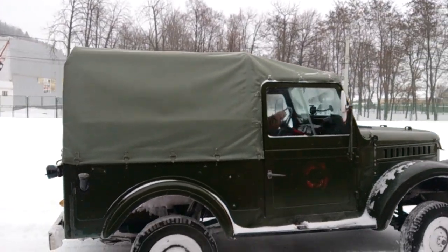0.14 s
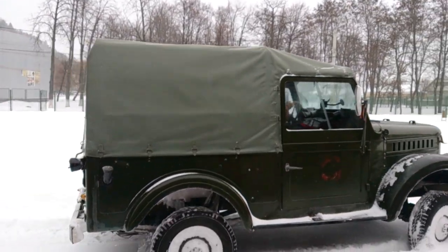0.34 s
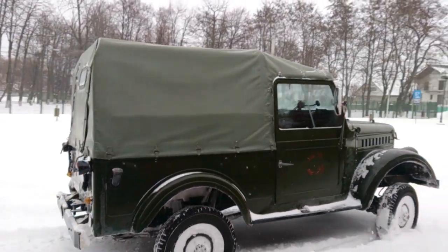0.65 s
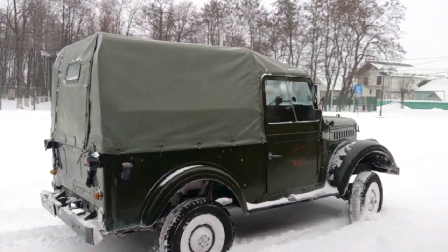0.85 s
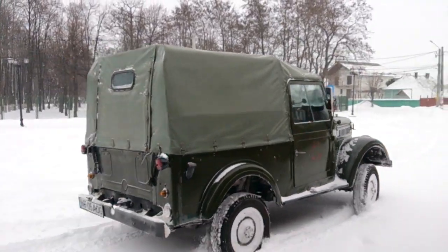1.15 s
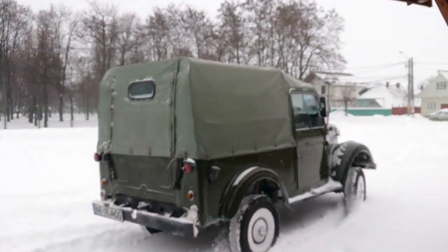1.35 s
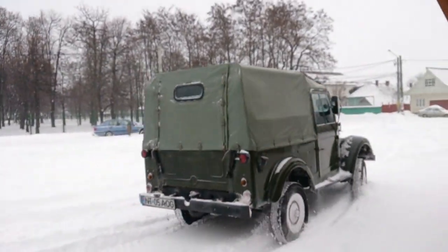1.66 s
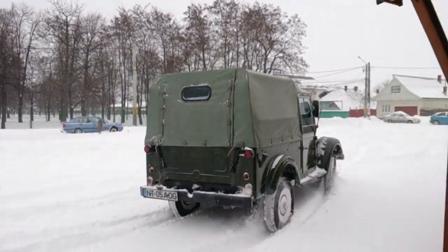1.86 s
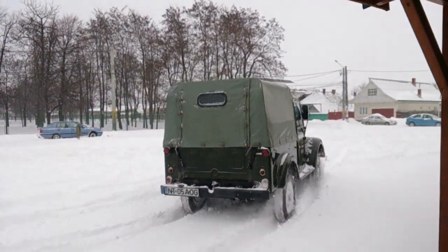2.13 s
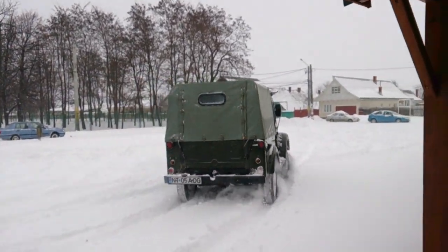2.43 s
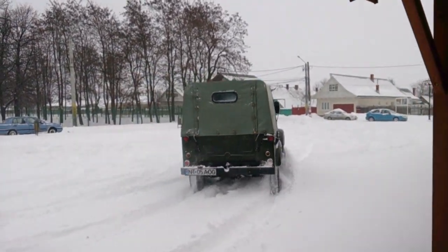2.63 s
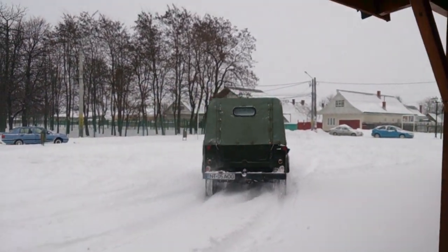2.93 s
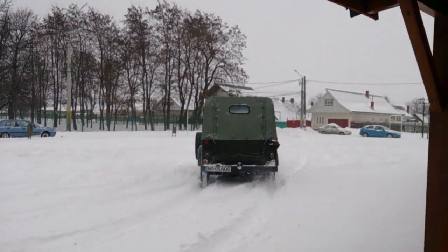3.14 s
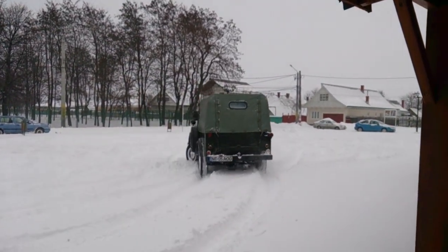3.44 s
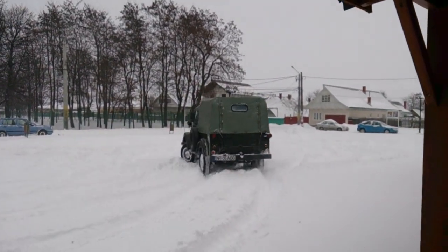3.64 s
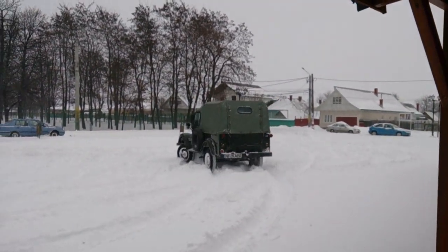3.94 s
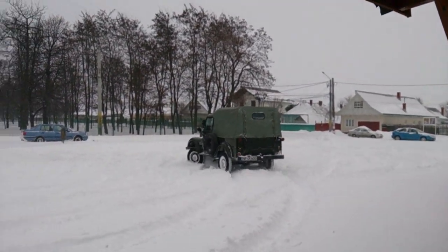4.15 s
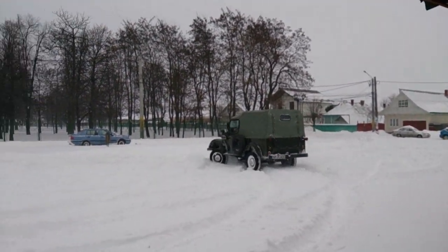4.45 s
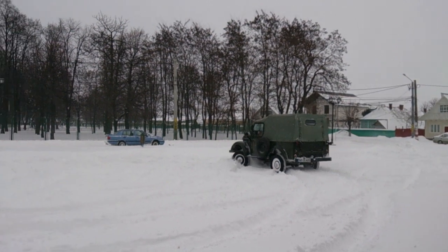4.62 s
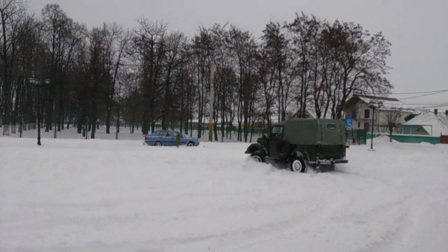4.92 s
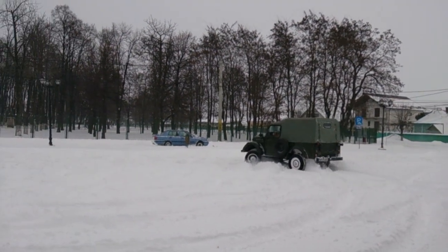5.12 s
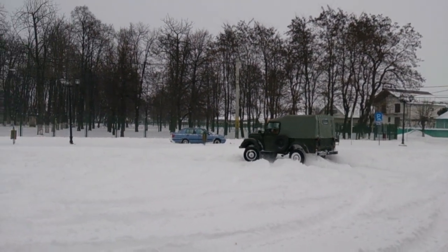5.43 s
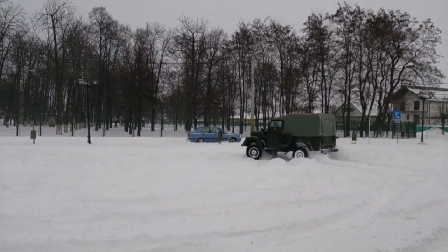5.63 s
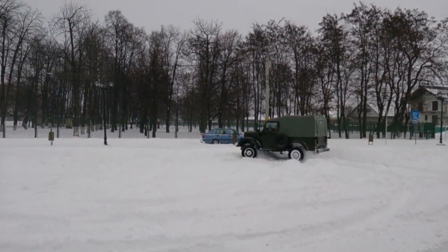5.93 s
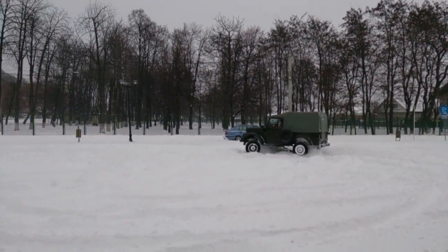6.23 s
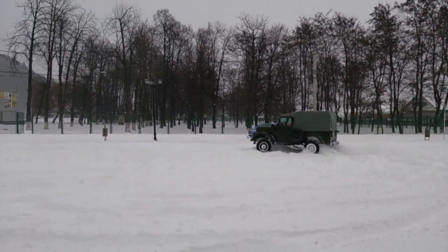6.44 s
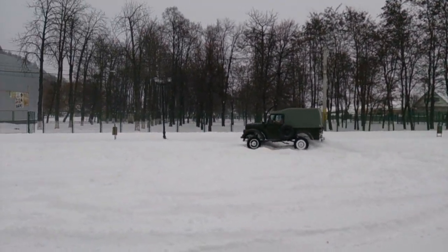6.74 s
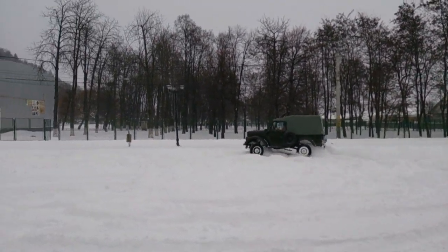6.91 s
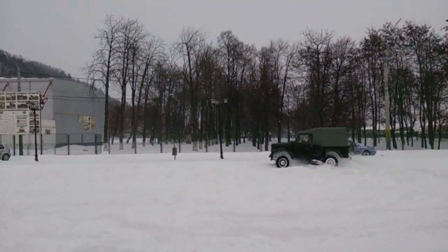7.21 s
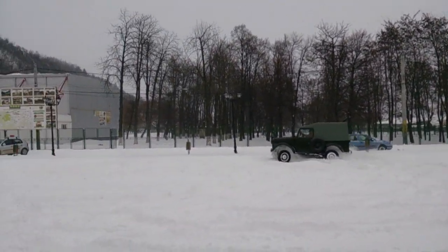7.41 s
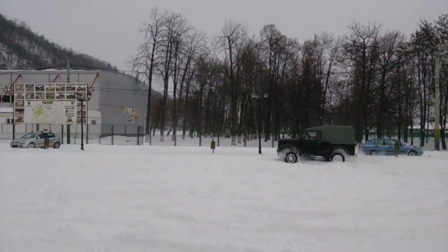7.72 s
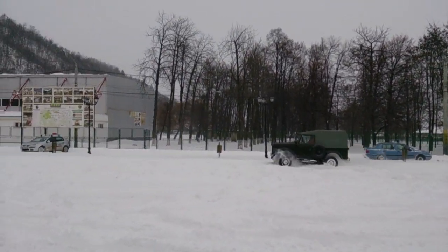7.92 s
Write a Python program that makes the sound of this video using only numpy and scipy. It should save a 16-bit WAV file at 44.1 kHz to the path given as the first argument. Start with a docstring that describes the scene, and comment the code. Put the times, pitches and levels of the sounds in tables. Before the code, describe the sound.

Outdoors in deep snow, an old canvas-topped off-roader passes very close to a hand-held stereo microphone. Its exhaust throbs low and sags almost to a stall while snow crunches and bodywork groans. The engine then picks up steadily, sheet metal knocks, and it circles away with growing clatter, metallic ticking and hiss. Soft wind rumble and a few dull microphone bumps come near the end.

```python
"""In deep snow, an old four-cylinder off-roader lugs past a hand-held stereo microphone at walking pace.
It then pulls away in a wide turn. The exhaust booms as orders of the firing rate shaped by pipe resonances.
Noise bursts at each firing make clatter, ticks and hiss, and set the body panels droning.
Shaped noise makes the tyres' rush, crunching snow and light wind; narrow bands of it squeak and groan.
Late on, short thuds bump softly against the microphone."""
import sys
import numpy as np
from scipy import signal
from scipy.fft import rfft, irfft, next_fast_len
from scipy.io import wavfile
from scipy.ndimage import uniform_filter1d, map_coordinates

SR = 44100
rng = np.random.default_rng(int(sys.argv[2]) if len(sys.argv) > 2 else 0)


def output_pcm(signal):
    """Save a mono or channel-first signal as 16-bit PCM at the path in sys.argv[1].

    Samples are clipped to [-1, 1] before scaling.
    """
    pcm = np.clip(np.atleast_2d(signal).T, -1, 1) * 32767
    wavfile.write(sys.argv[1], SR, np.round(pcm).astype(np.int16))


N = 355887
TIME = np.arange(N) / SR
SIZE = next_fast_len(N + 8192, real=True)
BINS = np.maximum(np.arange(SIZE // 2 + 1) * SR / SIZE, 1)   # Hz


def from_db(db):
    """Decibels to gain."""
    return 10 ** (np.asarray(db) / 20)


def rms_one(x):
    """Scale to rms 1."""
    return x / np.sqrt(np.mean(x ** 2) + 1e-20)


def in_time(rows):
    """The columns of a curve at every sample."""
    s, *columns = np.transpose(rows)
    return [np.interp(TIME, s, c) for c in columns]


def at_hz(points, hz):
    """Read a spectrum on a log-frequency axis."""
    f, value = np.transpose(points)
    return np.interp(np.log(hz), np.log(f), value)


def filtered(x, gain):
    """Apply one gain per frequency bin."""
    return irfft(rfft(x, SIZE) * gain, SIZE)[..., :N]


def coloured(x, spectrum):
    """Give a sound a spectrum that falls away beyond its ends; rms 1."""
    top_skirt = 1 / (1 + (BINS / spectrum[-1][0] / 2) ** 4)
    low_skirt = 1 / (1 + (spectrum[0][0] / BINS / 2) ** 4)
    return rms_one(filtered(x, from_db(at_hz(spectrum, BINS)) * top_skirt * low_skirt))


def drift(rate):
    """Random wander of rms 1, drawn between rate random points a second."""
    return rms_one(np.interp(TIME * rate, np.arange(8192), rng.standard_normal(8192)))


# how alike the noise is at the two ports: pitch_hz, correlation (0 to 1)
PORT_LIKENESS = [(60, 0.95), (140, 0.15), (300, 0.85), (650, 0.86), (1300, 0.55), (2500, 0.095),
                 (4500, 0.087), (8000, 0.16), (14000, 0.15)]


def air_noise():
    """White stereo noise whose likeness at the two ports depends on pitch."""
    alike = np.clip(at_hz(PORT_LIKENESS, BINS), 0, 1)
    mid, side = filtered(rng.standard_normal((2, N)), np.sqrt([1 + alike, 1 - alike]))
    return rms_one(np.array([mid + side, mid - side]))


def resonate(x, hz, width):
    """One resonance with gain 1 on top."""
    r = np.exp(-np.pi * width / SR)
    feedback = [1, -2 * r * np.cos(2 * np.pi * hz / SR), r * r]
    return signal.lfilter(np.array([1, 0, -1]) * (1 - r * r) / 2, feedback, x + 1e-18)


def band(drive, centre_hz, half_width_hz):
    """Noise gathered round a centre that may move; rms 1."""
    slow = signal.sosfilt(signal.butter(2, half_width_hz, fs=SR, output="sos"), drive)
    return rms_one(slow * np.sin(2 * np.pi * np.cumsum(centre_hz + np.zeros(N)) / SR))


def bell(x, centre, half_width):
    """A smooth rise and fall with height 1."""
    return np.exp(-((x - centre) / half_width) ** 2)


def swells(rows):
    """Add up smooth swells (centre_s, half_length_s, heights..); one curve per column of heights."""
    return sum(np.outer(heights, bell(TIME, s, half_s)) for s, half_s, *heights in rows)


def firing_samples(turn):
    """The sample at which each firing falls; turn counts the firings so far."""
    return np.flatnonzero(np.diff(np.floor(turn)) > 0) + 1


def cylinder_pattern(turn, cylinders_db, contrast):
    """Level in dB of the cylinder whose turn it is, at every sample."""
    return contrast * np.take(cylinders_db, np.floor(turn).astype(int), mode="wrap")


def strokes(turn, cylinders_db, decay_s, scatter_db, between, contrast=1):
    """A decaying burst at each firing, each of its own strength, over a steady share; rms 1."""
    at = firing_samples(turn)
    pattern_db = cylinder_pattern(turn, cylinders_db, contrast)
    chance = rng.standard_normal(1024)[:len(at)].clip(-2, 2)
    hits = np.zeros(N)
    hits[at] = from_db(pattern_db[at] + scatter_db * chance)
    bursts = signal.lfilter([1], [1, -np.exp(-1 / (decay_s * SR))], hits)
    return rms_one(uniform_filter1d(bursts, size=90) + between)


# each ring peaks after RING_S, sinking in pitch all the while
RING_S, RING_SINK_HZ_PER_S = 0.0014, 32000


def rings(blows, stray=0.55):
    """Blows (s, peak dB, Hz) ring as short sinking tones, each with its own phase at the two ports."""
    out, age = np.zeros((2, N + 2048)), np.arange(1024) / SR
    shape = age / RING_S * np.exp(1 - age / RING_S)
    for (s, db, hz), (phase, apart) in zip(blows, rng.standard_normal((1024, 2))):
        cycles = np.cumsum(hz - RING_SINK_HZ_PER_S * (age - 2 * RING_S)) / SR + phase
        port_phase = stray * apart * np.array([[1], [-1]])
        at = int(s * SR)
        out[:, at:at + len(age)] += from_db(db) * shape * np.sin(2 * np.pi * cycles + port_phase)
    return out[:, :N]


# the car's way past and round: time_s, distance_m (for the close sounds), left_lag_samples
CAR_PATH = [(0, 1.67, 2.5), (.8, 2.57, -0.5), (1.65, 2.57, -5.5), (2.7, 5.9, -6.5), (3.2, 10.3, -11),
            (4.2, 8.8, -10.5), (4.8, 52, -6), (8.07, 8.7, -6.5)]


def nearness_db():
    """Level by spreading, relative to two metres."""
    return -20 * np.log10(in_time(CAR_PATH)[0] / 2)


# below LUG_RATE firings per s the engine lugs in full
LUG_RATE = 30


def lugging(rate):
    """1 while the engine is near a stall, falling as it picks up."""
    return np.minimum(LUG_RATE / rate, 1) ** 2


# make-up of the exhaust pulses: multiple of the firing rate, then relative level_db at each ORDER_RATES
EXHAUST_ORDERS = [(.5, -14, -17, -8, -9), (1, 4.5, 3.5, 6, 1.5), (1.5, -14, -14.5, -12.5, -19),
                  (2, -4, 9.5, 0, -10), (2.5, -17, -15, -19, -7), (3, 2, -4, -7.5, -14),
                  (4, -11, -19, -13, -25), (5, -4, -10, 4, -16), (6, -8, -15, -12, -14),
                  (7, -8, -19, -14, -16), (8, -18, -17, -15, -15)]
# engine speeds of those level columns: firings_per_s
ORDER_RATES = [23, 35, 50, 70]
# each order's phase turns as it sweeps up through the silencer's main resonance
SILENCER_HZ, SILENCER_HALF_WIDTH_HZ = 56, 7


def pipe_tones(rate, turn, leads, response, flutter_db, uneven_db, stumble):
    """Each order swells as it sweeps through a pipe's resonances; half orders tell of unequal cylinders."""
    out, power = 0, 0
    irregular_db = uneven_db * lugging(rate)   # at low revs the orders waver in strength
    turn = turn + stumble * lugging(rate) * drift(16)   # and the firings in timing
    for (multiple, *levels_db), lead in zip(EXHAUST_ORDERS, leads):
        order_hz = multiple * rate
        phase = lead - np.arctan((order_hz - SILENCER_HZ) / SILENCER_HALF_WIDTH_HZ)
        gain = from_db(np.interp(rate, ORDER_RATES, levels_db) + at_hz(response, order_hz))
        waver = from_db(flutter_db * drift(25) + irregular_db * drift(19))
        out = out + gain * waver * np.sin(2 * np.pi * multiple * turn + phase)
        power = power + gain ** 2 / 2
    return out / np.sqrt(power)


# course of the whole exhaust, before the trim of each part: time_s, level_db
EXHAUST_LEVEL = [(0, -23), (.16, -22.5), (.3, -34.5), (.5, -30), (.93, -27), (1.05, -34), (1.65, -25),
                 (1.88, -22), (2.07, -30), (2.35, -27.5), (3.4, -32.5), (4.15, -33), (4.7, -29),
                 (4.97, -25), (7.1, -27), (7.5, -28.5), (7.8, -31), (8.07, -32.5)]
# the tailpipe against that course, dropping as the pipe turns away: time_s, relative_db
TAILPIPE_LEVEL = [(0, -11.5), (.55, -5.5), (.78, -13), (1.0, -5), (1.3, -5), (1.8, -19), (2.45, -10),
                  (2.8, -12.5), (3.1, -21), (4.0, -31), (4.55, -31), (4.8, -38), (5.3, -24), (6.0, -38)]


def tailpipe_gain():
    """Strength of the tailpipe's upper sound."""
    return from_db(in_time(EXHAUST_LEVEL)[0] + in_time(TAILPIPE_LEVEL)[0])


# resonances of the silencer: pitch_hz, relative level_db
SILENCER_RESPONSE = [(20, -13), (32, -10), (41, -17), (50, -9), (63, 0), (78, -2), (90, -6), (104, -27),
                     (119, -15.5), (134, -23), (160, -21), (195, -30), (240, -48), (330, -62)]
# upper resonances of the tailpipe: pitch_hz, relative level_db
TAILPIPE_RESPONSE = [(90, -35), (108, -12), (125, -1), (135, 4), (146, -3), (157, 0), (171, -2), (183, -14),
                     (200, -15), (260, -19), (330, -40), (400, -55)]
DRONE_BREAKUP = .5   # share of the drone lost when the engine lugs in full


def exhaust(rate, turn, boom_db=-2.5):
    """The same pulses boom in the silencer and drone in the tailpipe, where the orders are out of step."""
    in_step = np.zeros(len(EXHAUST_ORDERS))
    out_of_step = rng.uniform(0, 2 * np.pi, len(EXHAUST_ORDERS))
    boom = pipe_tones(rate, turn, in_step, SILENCER_RESPONSE,
                      flutter_db=0.4, uneven_db=1.5, stumble=0.0047)
    drone = pipe_tones(rate, turn, out_of_step, TAILPIPE_RESPONSE,
                       flutter_db=.8, uneven_db=2.8, stumble=0.014)
    boom_gain = from_db(in_time(EXHAUST_LEVEL)[0] + boom_db)
    drone_gain = tailpipe_gain() * (1 - DRONE_BREAKUP * lugging(rate))
    return boom_gain * boom + drone_gain * drone


# gas leaving the tailpipe: pitch_hz, relative level_db per Hz
BURBLE_SPECTRUM = [(20, -14), (40, -34), (65, 27), (100, -18), (138, 19.5), (170, 0), (200, -3), (300, -1),
                   (600, -40)]


def burble(rate, turn, level_db=1.0):
    """Turbulent gas leaves the tailpipe in puffs, most of all while the engine lugs."""
    puffs = strokes(turn, [0], decay_s=.008, scatter_db=2.0, between=.12)
    gain = from_db(level_db) * tailpipe_gain() * lugging(rate)
    return gain * coloured(air_noise() * puffs, BURBLE_SPECTRUM)


# engine noise, growing with the load and as the front comes round: time_s, level_db before offsets
ENGINE_LOAD = [(0, -47.5), (.7, -68.5), (1.8, -58), (3.3, -54), (4.4, -47), (5.0, -45.5), (5.5, -45.5),
               (6.2, -42), (7.35, -44.5), (7.75, -49), (8.07, -46)]
# the engine labours and its noise flares: centre_s, half_length_s, block_gain_db, hiss_gain_db
NOISE_FLARES = [(3.5, 0.26, 1, -4.5), (3.8, 0.14, 8, 4), (3.866, 0.007, 8.5, -12), (4.12, 0.16, 2.5, -3),
                (5.27, 0.15, 1, 6), (5.97, 0.11, 1.5, 3.5), (6.7, 0.097, 2.5, 4.5), (7.28, 0.42, 4.5, 6.5)]
# one hiss follows the load; the other is for close by and loses HISS_FALLOFF dB per dB of spreading
HISS_RE_LOAD_DB, HISS_NEAR_DB, HISS_FALLOFF = -10, -51.5, 0.82


def engine_levels():
    """Levels in dB of block, hiss and close hiss: the first two follow the load, and all flare together."""
    load_db, = in_time(ENGINE_LOAD)
    block_flare, hiss_flare = swells(NOISE_FLARES)
    near_db = HISS_NEAR_DB + HISS_FALLOFF * nearness_db()
    return load_db + block_flare, load_db + HISS_RE_LOAD_DB + hiss_flare, near_db + hiss_flare


# the four cylinders in firing order, spread further by the revs: relative level_db
CYLINDER_LEVELS = [-15.5, -7, -7, -5]
# resonances of the block: pitch_hz, half_width_hz, wander_hz, relative level_db
BLOCK_BANDS = [(1127, 135, 48, -9), (1807, 175, 30, -4), (2638, 530, 100, -2)]
# hiss of the engine that follows the load: pitch_hz, relative level_db per Hz
HISS_SPECTRUM = [(3300, 7.5), (4050, 9.5), (5000, 13), (5900, 7.5), (6700, 2.5), (8000, 2.5), (9200, 7.5),
                 (10200, -5), (12000, -8), (15000, -48)]
# hiss of the engine close by: pitch_hz, relative level_db per Hz
NEAR_HISS_SPECTRUM = [(3400, -9), (4000, -5), (5500, -4.5), (6600, -3), (8000, 6), (9200, 6), (10200, -3),
                      (12000, -6), (15000, -20.5)]
# a loose part rattles at a shifting pitch, stronger once the revs are up: time_s, level_db
RATTLE_LEVEL = [(4.35, -69), (4.65, -56), (5.6, -56.5), (6.5, -51), (7.3, -43), (7.75, -54.5),
                (8.07, -50.5)]
RATTLE_HZ, RATTLE_HALF_WIDTH_HZ, RATTLE_WANDER_HZ = 2600, 150, 80


def clatter(rate, turn):
    """Each firing shakes the block, rattles a loose part and lets out a puff of hiss."""
    block_db, hiss_db, near_db = engine_levels()
    contrast = (rate / 66) ** 2   # the cylinders grow more unequal with the revs
    shakes = strokes(turn, CYLINDER_LEVELS, decay_s=.0055, scatter_db=2.0, between=.22, contrast=contrast)
    puffs = strokes(turn, CYLINDER_LEVELS, decay_s=.005, scatter_db=2.8, between=.36, contrast=contrast)
    block = 0
    for hz, half_width, wander, db in BLOCK_BANDS:
        noise = band(air_noise() * shakes, hz + wander * drift(20), half_width)
        block = block + from_db(block_db + db - 5.5) * noise
    rattle_hz = RATTLE_HZ + RATTLE_WANDER_HZ * drift(22)
    rattle_noise = shakes * band(air_noise(), rattle_hz, RATTLE_HALF_WIDTH_HZ)
    rattle = from_db(in_time(RATTLE_LEVEL)[0]) * rattle_noise
    loaded_hiss = from_db(hiss_db) * coloured(air_noise() * puffs, HISS_SPECTRUM)
    near_hiss = from_db(near_db) * coloured(air_noise() * puffs, NEAR_HISS_SPECTRUM)
    return block + rattle + from_db(1.0 * drift(24)) * (loaded_hiss + near_hiss)


# course of the ticking, before the tick and buzz trims: time_s, lower_ring_db, upper_ring_db
TICK_LEVELS = [(0, -77, -76), (1.6, -65.5, -65), (3.0, -66, -77), (3.45, -59.5, -63.5), (3.75, -57, -55.5),
               (4.1, -74, -57), (4.35, -54, -59), (4.8, -56.5, -63), (5.5, -56, -61.5), (6.2, -44, -46),
               (6.8, -50.5, -49.5), (7.25, -38.5, -36.5), (7.75, -54, -54.5), (8.07, -57, -50.5)]
# the valve gear's two ringing pitches at higher revs: pitch_hz
TICK_PITCHES = [3680, 4695]
# both sit FLAT_HZ lower below the first of these engine speeds, and not beyond the second: firings_per_s
FLAT_RATES = [48.5, 50.5]
FLAT_HZ, RING_SCATTER_HZ = 230, 130


def valve_gear(rate, turn, tick_db=12.5, buzz_db=-7.5, buzz_half_width_hz=220, scatter_db=1.3):
    """A train of ringing ticks, one per firing, over a buzz at the same two pitches."""
    out, at = 0, firing_samples(turn)
    contrast = (rate / 66) ** 2
    pattern_db = cylinder_pattern(turn, CYLINDER_LEVELS, contrast)
    taps = strokes(turn, CYLINDER_LEVELS, decay_s=.005, scatter_db=2.0, between=.15, contrast=contrast)
    for hz, level_db in zip(TICK_PITCHES, in_time(TICK_LEVELS)):
        pitch = hz - np.interp(rate, FLAT_RATES, [FLAT_HZ, 0])
        strength, detune = rng.standard_normal((1024, 2))[:len(at)].clip(-2, 2).T
        peak_db = (level_db + pattern_db)[at] + tick_db + scatter_db * strength
        ticks = rings(zip(at / SR, peak_db, pitch[at] + RING_SCATTER_HZ * detune))
        buzz = band(air_noise() * taps, pitch, buzz_half_width_hz)
        out = out + ticks + from_db(level_db + buzz_db) * buzz
    return out


# the knock comes mostly from one of four cylinders: relative level_db
KNOCK_LEVELS = [-15.0, 0.0, -12.0, -14.0]
# body panels: pitch_hz, width_hz, knock_share, db_re_load, close_db (at two metres),
# critical_rate and rate_half_width (firings per s), boost_db there
BODY_PANELS = [(336, 56, 0.14, -27, -60, 24, 2.8, 3), (488, 86, 0.82, -27, -71, 52.7, 9.5, 9),
               (598, 103, 0.22, -15.5, -54, 25.6, 3, 4.5), (792.4, 58, 0.68, -17, -55, 39, 6, 9),
               (924, 50, 0.76, -14, -61, 49.9, 6.9, 8.5)]
PANEL_FALLOFF = 1.93   # dB lost per dB of spreading


def panels(rate, turn):
    """One strong knock in four firings sets the sheet metal droning, each panel most at its own revs."""
    out, load_db, near_db = 0, in_time(ENGINE_LOAD)[0], PANEL_FALLOFF * nearness_db()
    knock = strokes(turn + .3, KNOCK_LEVELS, decay_s=.009, scatter_db=1.5, between=.13)
    for hz, width, share, loaded_db, close_db, critical_rate, rate_width, boost_db in BODY_PANELS:
        drive = air_noise() * (1 + min(share, 1) * (knock - 1))
        gain = np.hypot(from_db(load_db + loaded_db), from_db(close_db + near_db))
        gain = gain * from_db(boost_db * bell(rate, critical_rate, rate_width))
        out = out + gain * rms_one(resonate(resonate(drive, hz, width), hz, 4 * width))
    return out


# rush of the tyres: pitch_hz, relative level_db per Hz
TYRE_SPECTRUM = [(120, 11), (230, 3), (330, -2), (450, 0.5), (700, -3), (1000, 1.5), (1400, -2), (2200, -4),
                 (4000, -14.5), (7000, -15), (14000, -54)]
# the wheels squeeze fresh snow: centre_s, half_length_s, level_db
SNOW_SQUEEZES = [(0.027, 0.58, -50), (1.5, 1, -74)]
# crunch of the snow: pitch_hz, relative level_db per Hz
SNOW_SPECTRUM = [(500, -37), (1200, 7), (2000, 2), (3300, 23), (5000, 8), (8000, 15.5), (11000, 9.5),
                 (15000, -19)]
# a rush heard close by, and wheelspin that grows with the revs (SPIN_DB at SPIN_RATE firings per s)
ROLL_NEAR_DB, ROLL_FALLOFF = -46, 0.84
SPIN_DB, SPIN_RATE, SPIN_DB_PER_RATE = -50, 75.3, 0.46


def tyres(rate):
    """The wheels roll with a dull rush and churn more as they speed up; close by, snow crunches in clumps."""
    near_gain = from_db(ROLL_NEAR_DB + ROLL_FALLOFF * nearness_db())
    spin_gain = from_db(SPIN_DB + SPIN_DB_PER_RATE * (rate - SPIN_RATE))
    roll_noise = coloured(air_noise() * from_db(1.8 * drift(70)), TYRE_SPECTRUM)
    roll = np.hypot(near_gain, spin_gain) * roll_noise
    grains = from_db(2.0 * drift(700) + 2.0 * drift(29.0))
    squeeze = sum(from_db(db) * bell(TIME, s, half_s) for s, half_s, db in SNOW_SQUEEZES)
    return roll + squeeze * coloured(air_noise() * grains, SNOW_SPECTRUM)


# gusts at the microphone: centre_s, half_length_s, gain_db
WIND_GUSTS = [(5.8, 0.35, 3.7), (6.85, 0.13, 14.4), (7.25, .25, 5.7)]
# rumble of the wind: pitch_hz, relative level_db per Hz
WIND_SPECTRUM = [(12, -19), (28, -7), (50, -6), (100, -14.5), (250, -49), (600, -50)]
WIND_DB = -48   # between gusts


def wind():
    """Light wind rumbles at the microphone's ports and swells in gusts."""
    return from_db(WIND_DB + swells(WIND_GUSTS)[0]) * coloured(air_noise(), WIND_SPECTRUM)


# snow squeaks under the tread: centre_s, pitch_hz, level_db
SNOW_SQUEAKS = [(.853, 2630, -58), (.895, 2600, -59), (.945, 2600, -56), (1.105, 2150, -57),
                (1.23, 2830, -59), (1.36, 2120, -58)]
SQUEAK_HALF_S, SQUEAK_HALF_WIDTH_HZ = 0.016, 60
# the body groans as it passes: centre_s, half_length_s, pitch_hz, glide_hz_per_s, level_db
BODY_GROANS = [(0.072, 0.087, 618, -2, -48), (0.358, 0.11, 625, 150, -48.5), (0.532, 0.1, 662, -1200, -55),
               (1.0, 0.29, 604, 0, -50), (1.04, 0.082, 340, 0, -47.5), (1.55, 0.39, 762, -29.5, -51.5)]
GROAN_HALF_WIDTH_HZ = 18


def creaks(turn):
    """Close by, the snow gives short squeaks and the body longer groans, which throb with the firings."""
    drive = air_noise()
    throb = strokes(turn, KNOCK_LEVELS, decay_s=.012, scatter_db=2, between=.3, contrast=.5)
    squeaks, groans = 0, 0
    for s, hz, db in SNOW_SQUEAKS:
        swell = from_db(db) * bell(TIME, s, SQUEAK_HALF_S)
        squeaks = squeaks + swell * band(drive, hz, SQUEAK_HALF_WIDTH_HZ)
    for s, half_s, hz, glide, db in BODY_GROANS:
        swell = from_db(db) * bell(TIME, s, half_s)
        tone = band(rng.standard_normal(N), hz + glide * (TIME - s), GROAN_HALF_WIDTH_HZ)
        groans = groans + swell * tone
    return squeaks + throb * groans


# the loudest knocks of the sheet metal as the car draws away: centre_s, level_db
PANEL_KNOCKS = [(2.36, -48), (2.55, -50.5), (2.845, -52), (2.943, -52), (3.04, -56)]
KNOCK_HZ, KNOCK_HALF_WIDTH_HZ, KNOCK_HALF_S = 820, 38, 0.014


def knocks():
    """Single knocks on one panel: short swells of noise about its pitch."""
    swell = sum(from_db(db) * bell(TIME, s, KNOCK_HALF_S) for s, db in PANEL_KNOCKS)
    return swell * band(air_noise(), KNOCK_HZ, KNOCK_HALF_WIDTH_HZ)


# the hardest pings of the engine: start_s, peak_db, pitch_hz, lower_ring_db and tick_db (before trims)
ENGINE_PINGS = [(3.626, -45, 4420, -64, -53), (3.670, -47, 4380, -52, -56), (3.714, -46, 4350, -47, -56),
                (3.7574, -39, 4500, -55, -54), (3.8402, -48, 4570, -60, -50), (4.0055, -47, 4320, -60, -54),
                (4.087, -37, 4550, -61, -61), (4.1086, -41, 4400, -54, -64), (5.206, -44, 4750, -50, -49),
                (5.2734, -36, 4690, -36, -47), (6.0306, -31, 4660, -52, -52), (6.1814, -35, 4700, -52, -47),
                (6.3914, -35, 4900, -42, -54), (6.9676, -28, 4670, -47, -48), (6.998, -28, 4600, -45, -46),
                (7.024, -22, 4800, -42, -46), (7.0514, -29, 4800, -46, -51), (7.1626, -27, 4850, -36, -42),
                (7.2185, -34, 4990, -39, -43), (7.3023, -28.5, 4790, -45, -43),
                (7.4111, -29.5, 4830, -43, -52), (7.4654, -33, 4900, -44, -52),
                (7.5757, -36, 4700, -48, -52), (7.6304, -38, 4600, -60, -49)]


def hard_pings(rate, lower_db=6.0, tick_db=7.5, tick_s=.003):
    """Under load a few strokes ring out above the others, with a lower ring and a bright noise tick."""
    s, db, hz, low_db, bright_db = np.transpose(ENGINE_PINGS)
    at = (s * SR).astype(int)
    low_hz = TICK_PITCHES[0] - np.interp(rate[at], FLAT_RATES, [FLAT_HZ, 0])
    hits = np.zeros(N)
    hits[at] = from_db(bright_db + tick_db)
    bursts = signal.lfilter([1], [1, -np.exp(-1 / (tick_s * SR))], hits + 1e-18)
    ticks = bursts.std() * coloured(bursts * air_noise(), HISS_SPECTRUM)
    return rings(zip(s, db, hz)) + rings(zip(s, low_db + lower_db, low_hz)) + ticks


# a brief rasp as the engine labours; its pitch glides for RASP_GLIDE_S either side of the centre
RASP_S, RASP_HALF_S, RASP_DB = 5.265, 0.1, -42.5
RASP_FROM_HZ, RASP_TO_HZ, RASP_GLIDE_S = 2300, 3420, 0.11


def rasp(turn, half_width_hz=550):
    """A grainy crackle, strongest on every second firing, swells and brightens as the engine labours."""
    glide_s = [RASP_S - RASP_GLIDE_S, RASP_S + RASP_GLIDE_S]
    centre_hz = np.interp(TIME, glide_s, [RASP_FROM_HZ, RASP_TO_HZ])
    pulses = strokes(turn, [-9, 0], decay_s=.006, scatter_db=1, between=.1)
    grains = from_db(3 * drift(400)) * pulses
    crackle = band(air_noise() * grains, centre_hz, half_width_hz)
    return from_db(RASP_DB) * bell(TIME, RASP_S, RASP_HALF_S) * crackle


# bumps on the microphone: start_s, peak_db (before the ports' gains), brightness_hz
MIC_BUMPS = [(6.804, -25, 430), (6.861, -25, 290), (6.942, -33, 250), (7.248, -38, 300), (7.372, -41, 260)]


def bumps(decay_s=0.0093):
    """Soft contacts thud through the microphone's case: decaying noise with its treble cut."""
    out, age = np.zeros(N), np.arange(4096) / SR
    for s, db, hz in MIC_BUMPS:
        burst = rng.standard_normal(len(age)) * np.exp(-age / decay_s)
        thud = signal.sosfilt(signal.butter(3, hz, fs=SR, output="sos"), burst)
        at = int(s * SR)
        out[at:at + len(age)] += from_db(db) * thud / np.abs(thud).max()
    return out


# engine speed sags almost to a stall, then climbs and levels off: time_s, firings_per_s
FIRING_RATE = [(0.0, 34.98), (0.111, 33.2), (0.32, 25.58), (0.763, 21.5), (1.226, 27.27), (2.014, 35.34),
               (2.791, 41.49), (3.606, 45.04), (3.734, 46.86), (4.494, 51.56), (5.522, 63.05),
               (6.642, 68.55), (6.92, 71.75), (7.529, 72.92), (7.737, 71.06), (8.07, 70.16)]


def scene():
    """The car's sound reaches the two ports at different times; wind and bumps arise at the microphone."""
    rate, = in_time(FIRING_RATE)
    turn = np.cumsum(rate) / SR + .79   # firings so far
    engine = exhaust(rate, turn) + burble(rate, turn) + clatter(rate, turn) + valve_gear(rate, turn)
    bodywork = panels(rate, turn) + creaks(turn) + knocks()
    left, right = engine + bodywork + tyres(rate) + hard_pings(rate) + rasp(turn)
    left = map_coordinates(left, [np.arange(N) - in_time(CAR_PATH)[1]], order=3, mode="nearest")
    return np.array([left, right]) + wind() + bumps() * from_db([[4], [-7]])


# colour of the two ports: pitch_hz, left_minus_right_db
PORT_BALANCE = [(60, -4.7), (140, -3.5), (450, -2), (900, -4), (1250, -5.5), (2450, -2), (3000, 0),
                (3700, 5), (4600, -2.5), (7700, -3), (9300, 6), (12000, 1)]
# phase of the two ports: pitch_hz, left_lead_radians
PORT_LEAD = [(60, .6), (300, -.1), (900, -.7), (2450, -.9), (3700, -.2), (6000, .7), (8000, -1.2),
             (14000, -1)]
CUTOFF_HZ = 15500


def record(dry):
    """The microphone's two ports differ in colour and phase; the top is cut."""
    sides = np.array([[.5], [-.5]])
    ports = from_db(at_hz(PORT_BALANCE, BINS) * sides)
    ports = ports / np.sqrt(np.mean(ports ** 2, axis=0))   # same total power at every pitch
    ports = ports * np.exp(1j * at_hz(PORT_LEAD, BINS) * sides)
    top_cut = signal.ellip(10, .1, 80, CUTOFF_HZ, fs=SR, output="sos")
    return signal.sosfilt(top_cut, filtered(dry, ports))


dry = scene()
out = record(dry)
output_pcm(out)
```